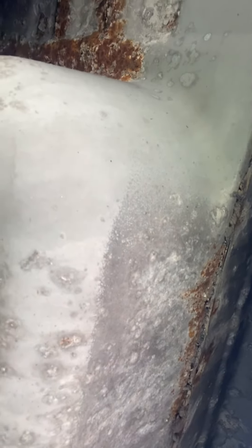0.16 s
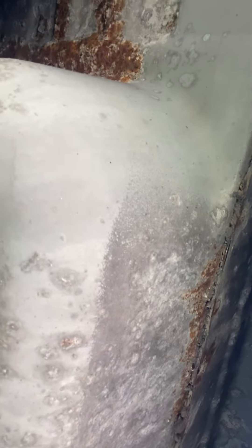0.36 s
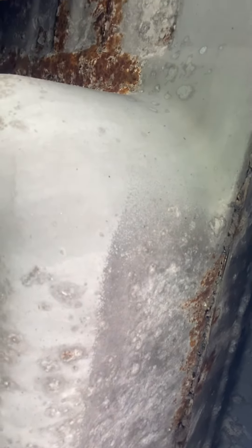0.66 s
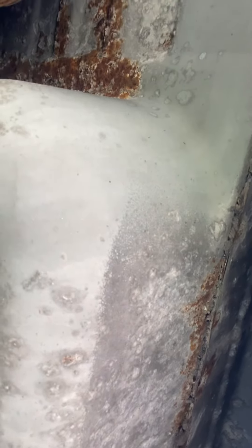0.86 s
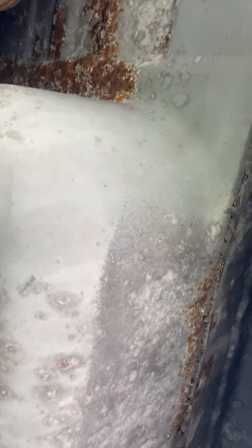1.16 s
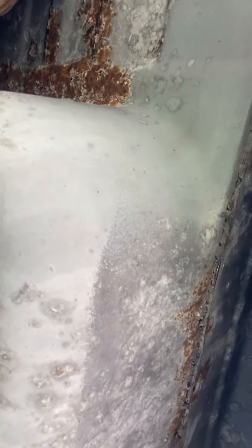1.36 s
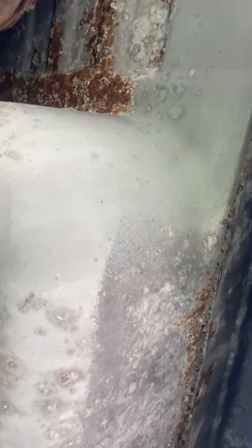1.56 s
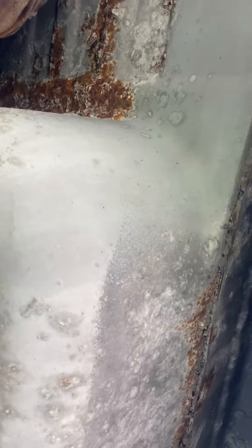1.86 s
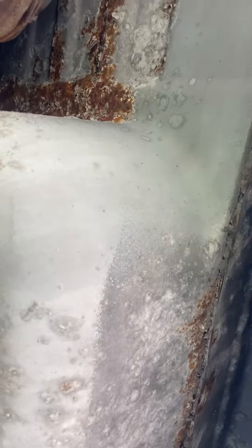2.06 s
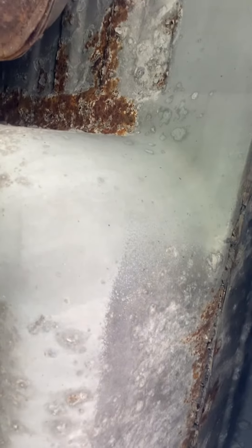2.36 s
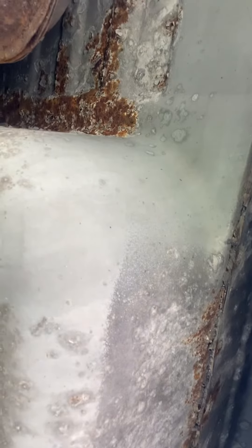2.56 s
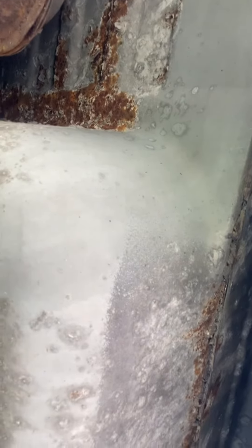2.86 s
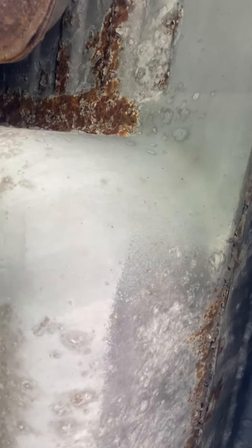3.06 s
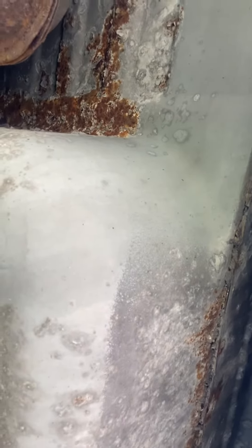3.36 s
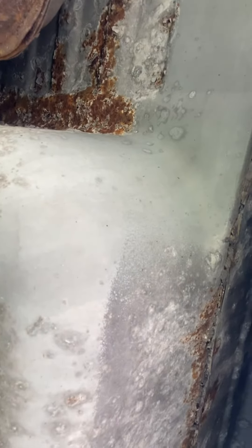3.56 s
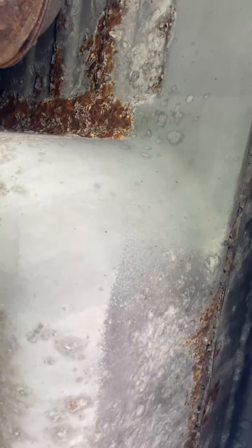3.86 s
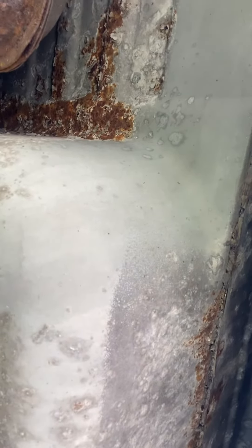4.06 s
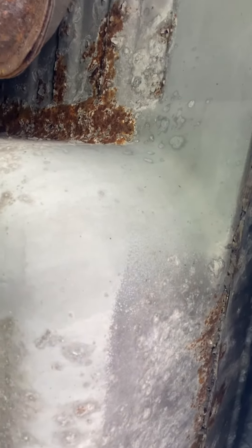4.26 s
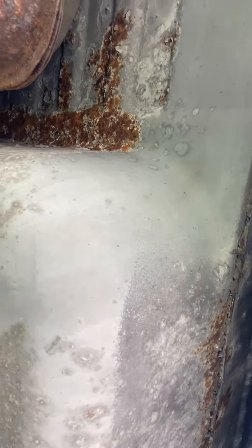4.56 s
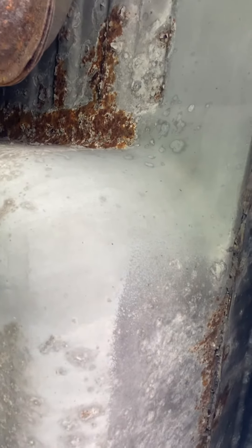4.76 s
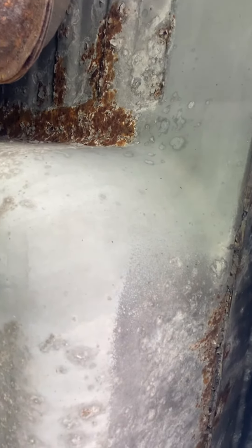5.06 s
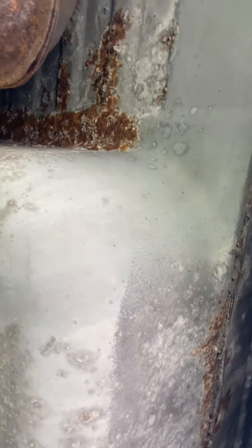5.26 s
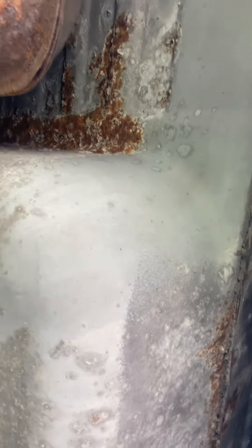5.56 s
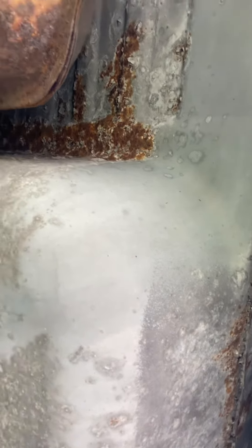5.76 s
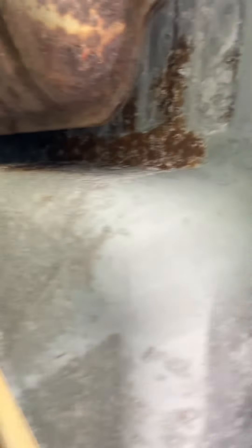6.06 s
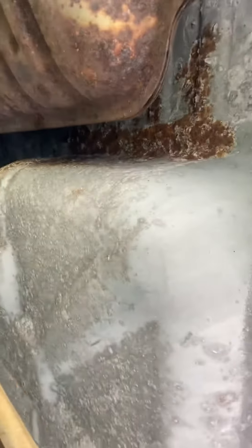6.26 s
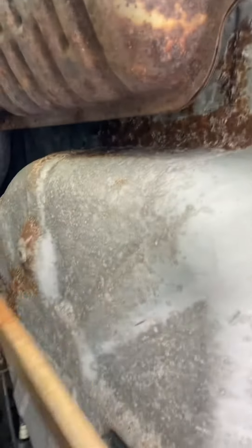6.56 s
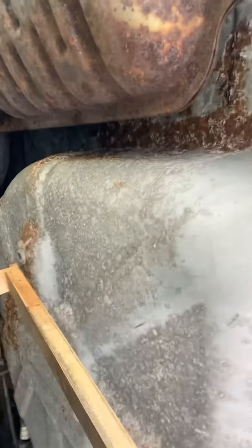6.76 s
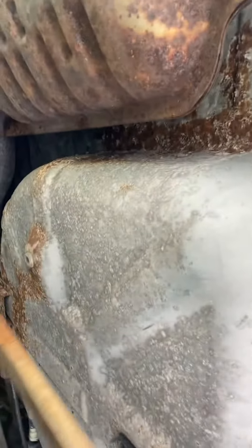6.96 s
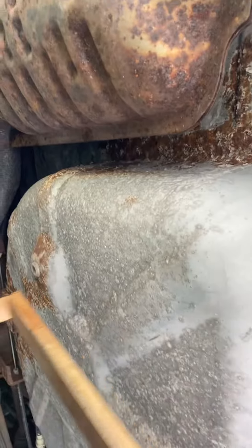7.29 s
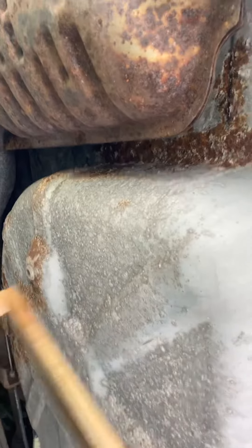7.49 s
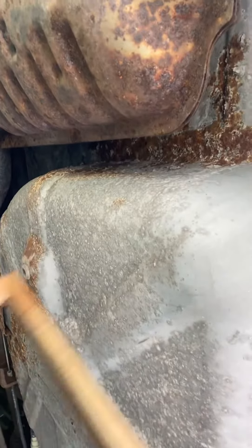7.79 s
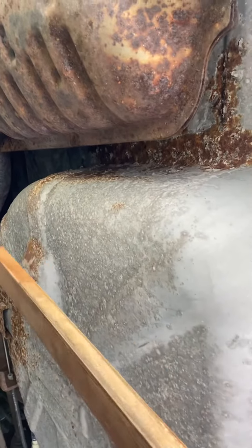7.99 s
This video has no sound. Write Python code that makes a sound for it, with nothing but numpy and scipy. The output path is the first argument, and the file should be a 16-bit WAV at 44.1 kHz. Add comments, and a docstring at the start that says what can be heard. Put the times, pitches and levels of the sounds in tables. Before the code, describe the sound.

A wooden strip raps a hollow steel fuel tank under a car, two to three times a second, very close to the microphone. Each knock has a hard crack, a hollow metallic body and a short low boom. Later blows bounce lightly and change tone as the spot shifts. Behind them lie soft distant traffic rumble and a faint, repeated bird chirp.

```python
"""Wood knocking on a steel fuel tank

A strip of wood strikes the tank under a car two to three times a second, close to a phone with two ports.
Each blow is shaped noise for the crack and clatter plus decaying sines for the boom, coloured by its spot.
The strip at times bounces or scrapes, and a few blows leave a panel singing.
Behind lie a low outdoor rumble of filtered noise and a small bird, a gliding sine that repeats one chirp."""
import sys
import numpy as np
from scipy import signal
from scipy.fft import rfft, irfft, next_fast_len
from scipy.io import wavfile
from scipy.ndimage import uniform_filter1d

SR = 44100
rng = np.random.default_rng(int(sys.argv[2]) if len(sys.argv) > 2 else 0)


def file_out(sig):
    """Save sig as 16-bit WAV at sys.argv[1]."""
    # one column per channel
    cols = np.atleast_2d(sig).T
    # limit, then scale
    lim = np.clip(cols, -1, 1)
    pcm = np.round(lim * 32767).astype(np.int16)
    wavfile.write(sys.argv[1], SR, pcm)


N = 358533

RING = 22050  # samples that one blow or call may last
LEAD = 1024  # samples of soft front edge before a sound
ATTACK_S = 0.0054  # time that the wood takes to press home

# Colour of the crowd of higher modes of wood and sheet steel: frequency_hz, relative level_db per Hz
CLATTER_COLOUR = [(60, -26), (130, 5), (190, -0.5), (240, 2), (430, 4.5), (780, -2), (970, 2.5),
                  (1700, -2.5), (2250, -4.5), (2560, -13.5), (2950, -4.5), (3450, -6), (4200, -13.5),
                  (5000, -32.5), (5700, -20.5), (6700, -15.5), (8000, -28), (10500, -32), (15500, -57)]
# Borders between boom, thud, body, knock, clack, crack, snap and tick: frequency_hz
REGISTER_BORDERS = [175, 370, 750, 1350, 2700, 4200, 6000]


def knock(texture, force_db, hardness_db, crack_db, length, treble_length,
          panel_hz, panel_db, middle_hz, middle_db, upper_hz, upper_db, strip_hz, strip_db,
          spot, modes_db=-12):
    """One blow: the spot colours it, force sets the level, and a harder contact raises the treble most."""
    # Spots on the tank, by name: boom_db, thud_db, body_db, knock_db, clack_db, crack_db, snap_db, tick_db
    spots = {"deep": (-13.5, -15.5, -22, -22, -24.5, -32, -37, -29),
             "full": (-12, -19, -16, -15.5, -19.5, -23, -36.5, -30),
             "round": (-15, -15, -20, -14.5, -18.5, -26.5, -30, -29.5),
             "hollow": (-16.5, -20, -16.5, -18, -19.5, -21.5, -27.5, -25.5),
             "open": (-15.5, -19, -12, -15.5, -15.5, -26.5, -30, -27),
             "dry": (-17.5, -19.5, -25, -20.5, -20, -30.5, -35.5, -34.5),
             "woody": (-19.5, -22, -25, -20, -21.5, -29, -48, -37.5),
             "sharp": (-20, -25.5, -23, -20, -15, -17, -27, -34),
             "stiff": (-17, -19, -27, -38, -24, -28.5, -36, -34.5),
             "edge": (-14.5, -22.5, -27, -33, -17.5, -38, -25, -28.5),
             "hard": (-19, -20.5, -28, -42, -19.5, -27, -26, -26)}
    # Share of the hardness that each register gains, boom to tick: share (no unit)
    hardness_share = (0.083, 0.05, 0.3, 0.56, 0.74, 0.9, 0.8, 0.79)
    levels_db = force_db + np.array(spots[spot]) + hardness_db * np.array(hardness_share)

    x = clatter(texture, max(length, .3), crack_db, treble_length)
    x = bend(x + undb(modes_db) * tank())
    resonances = (panel_hz, panel_db), (middle_hz, middle_db), (upper_hz, upper_db), (strip_hz, strip_db)
    for hz, db in resonances:
        # higher resonances are damped more: a least width plus a share of the centre
        width_hz = 47.5 + 0.025 * hz
        x = resonate(x, hz, width_hz, db)
    return balance(ports(x), REGISTER_BORDERS, levels_db, size=882)


def clatter(texture, length, crack_db, treble_length, crack_tilt_db=-1.2,
            fresh=0.81, apart_db=-5, ragged_db=2.0):
    """Countless overlapping modes, partly alike at every blow: a hard contact, then a short ragged decay."""
    # Decay of the higher modes at relative length 1: frequency_hz, t60_s
    decay_times = [(100, 0.36), (500, 0.35), (1200, 0.22), (2200, 0.24), (3500, 0.17), (10000, 0.13)]
    crack_s = 0.0018  # length of the contact crack at 1 kHz
    crack_halving_octaves = 13.6  # the crack is shorter in the treble: rise in pitch that halves it

    t = np.arange(RING) / SR
    noise = texture + fresh * rng.standard_normal(RING)
    noise = noise + undb(apart_db) * rng.standard_normal((2, RING))  # what differs between the ports
    # the strip chatters on the steel, so the decay comes in uneven spurts
    spurts = np.interp(np.arange(RING), np.arange(0, RING, 100), rng.standard_normal(RING // 100 + 1))
    ragged = noise / rms(noise) * undb(ragged_db * spurts)

    centres = np.geomspace(125, 8000, 7)
    octaves = np.log2(centres / np.median(centres))
    bands = split(ragged, centres[:-1] * np.sqrt(2))
    out = 0
    for band, hz, octave in zip(bands, centres, octaves):
        pace = t / (crack_s * 2 ** (-octave / crack_halving_octaves))
        # the tilt is in dB per octave above 1 kHz
        crack_gain = undb(crack_db + crack_tilt_db * octave)
        crack = crack_gain * 2 * np.sqrt(pace) * np.exp(-pace ** 2)
        # wood that stays on the steel changes how long the treble rings
        treble_share = np.interp(hz, (1000, 6000), (1, max(treble_length, .2)))
        t60 = length * curve(decay_times, hz) * treble_share
        ring = np.minimum(t / ATTACK_S, 1) * decay(t, t60)
        out = out + band * (crack + ring)
    return shape(out, causal(undb(curve(CLATTER_COLOUR, bins(t)))))


def tank(scatter_db=2.5, detune=0.0264, apart_db=2.5):
    """The tank's modes as decaying sines; each blow detunes and weights them anew, the weights per port."""
    # Ringing of the tank before each blow's scatter: frequency_hz, level_db, t60_s
    modes = [(77.6, -0.5, 0.31), (99.6, -4.5, 0.41), (123.4, -2, 0.27), (162.6, -4.5, 0.17),
             (211, 1, 0.073), (240, -3, 0.066), (287.9, -9.5, 0.14), (356.7, -2.5, 0.14), (442.6, -9, 0.16),
             (534, -9.5, 0.11), (558, -4, 0.076), (601.5, -8, 0.1495), (671.3, -12.5, 0.24),
             (874, -17, 0.14), (961, -1.5, 0.071), (1121, 3.5, 0.023), (1434, -5.5, 0.087),
             (1700, -25, 0.11), (1904, -1, 0.017), (2038, -6.5, 0.076), (2306, -13.5, 0.088),
             (3266, -9, 0.025), (3480, -10, 0.052), (3793, -6.5, 0.024), (4170, -27, 0.03),
             (4445, -19.5, 0.022), (6900, -40, 0.021), (10830, -40, 0.019)]
    t = np.arange(RING) / SR
    hz, db, t60 = np.transpose(modes)
    chance = rng.standard_normal((len(hz), 4)).T
    sign = (-1) ** np.arange(len(hz))
    size = undb(db + scatter_db * chance[0] + apart_db * chance[2:]) * sign
    # growth rate of each mode: pitch as the imaginary part, decay as the real part
    pole = 2j * np.pi * hz * (1 + detune * chance[1]) - np.log(1000) / t60
    return size @ np.exp(pole[:, None] * t).imag


def bend(x, lag_s=0.001):
    """Bending waves in sheet steel: the lows travel slowly and arrive late (lag_s at 1 kHz)."""
    return shape(x, np.exp(-4j * np.pi * lag_s * np.sqrt(1000 * bins(x))))


def bounce(texture, thud_db, clack_db, crack_db, tick_db, length,
           modes_db=-11, wood_hz=2100, wood_db=1.0):
    """A glancing touch: clatter and tank modes with one wood resonance, levelled in four registers."""
    # Borders between thud, clack, crack and tick of a rebound: frequency_hz
    borders = [500, 2600, 5200]
    x = clatter(texture, max(length, .3), crack_db=3.0, treble_length=0.49, crack_tilt_db=-1.5)
    x = x + undb(modes_db) * bend(tank())
    x = resonate(x, wood_hz, width_hz=260, db=wood_db)
    return balance(ports(x), borders, (thud_db, clack_db, crack_db, tick_db), size=350)


def panel_ring(hz, db, t60):
    """One lingering tone of the sheet steel: a sine that swells quickly and dies away."""
    t = np.arange(RING) / SR
    fade = np.minimum(t / ATTACK_S, 1) * decay(t, t60)
    return ports(undb(db) * fade * np.sin(2 * np.pi * hz * t))


def scrape(length_s, db, grain_db=4, tilt_db=4):
    """Wood dragged over rusty steel: a brief gritty hiss (tilt_db per octave)."""
    t = np.arange(RING) / SR
    grit = np.interp(np.arange(RING), np.arange(0, RING, 60), rng.standard_normal(RING // 60 + 1))
    hz = bins(t)
    colour_db = curve(CLATTER_COLOUR, hz) + tilt_db * np.log2(hz / 1000)
    gritty = rng.standard_normal(RING) * undb(grain_db * grit)
    x = ports(shape(gritty, undb(colour_db)))
    stroke = np.sqrt(np.abs(np.sin(np.pi * np.minimum(t / length_s, 1))))
    return undb(db) * x / rms(x) * stroke


def bird(buzz_hz=95, buzz_depth=0.026, wander=0.031, clear_at_s=0.1, end_roughness=0.73,
         drop_at_s=0.086, drop_s=0.0167, flutter_db=2.0, echo_db=-5, echo_t60=0.26):
    """A distant bird: a thin buzzy note, then a lower, clearer one that may drop, smeared by walls around."""
    # Calls: start_s, level_db (added to the note's), final drop in pitch_hz
    calls = [(0.245, -59, 453), (1.286, -59, 420), (3.07, -56.5, 506), (3.869, -57, 602), (4.634, -56, 100),
             (5.591, -60.5, 0), (6.425, -52.5, 402), (7.405, -53.5, 3)]
    # The two overlapping notes of a call, before its changes of pace and pitch: time_s, pitch_hz, level_db
    high_note = [(0, 4200, -9), (.012, 4270, 2.5), (.035, 4090, 6), (.055, 3900, 7), (.07, 3900, -28)]
    low_note = [(.025, 3480, -15), (.04, 3370, 12), (.06, 3344, 9), (0.079, 3550, 15.5), (.1, 3520, 11.5),
                (.118, 3470, 2), (.135, 3460, -20)]

    t = np.arange(RING) / SR
    out = np.zeros((1, N))
    for start, call_db, drop_hz in calls:
        pace = t * np.exp(0.061 * rng.standard_normal())  # each call runs a little faster or slower
        for note in high_note, low_note:
            s, hz, db = np.transpose(note)
            drop = drop_hz * np.clip((pace - drop_at_s) / drop_s, 0, 1)
            pitch = np.interp(pace, s, hz) - drop
            buzz = buzz_depth * np.sin(2 * np.pi * buzz_hz * t)
            waver = uniform_filter1d(rng.standard_normal(RING), size=100)
            rough = np.interp(pace, (0, clear_at_s), (1, end_roughness))
            pitch = pitch * (1 + rough * (buzz + wander * waver / rms(waver)))

            flutter = uniform_filter1d(rng.standard_normal(RING), size=300)
            level_db = call_db + np.interp(pace, s, db) + flutter_db * flutter / rms(flutter)
            gain = undb(level_db) * (pace > s[0]) * (pace < s[-1])
            add(out, start, gain * np.sin(2 * np.pi * np.cumsum(pitch) / SR)[None])
    walls = rng.standard_normal((2, RING)) * decay(t, echo_t60)
    echo = signal.fftconvolve(out, walls / np.linalg.norm(walls[0]))[:, :N]
    return ports(out + undb(echo_db) * echo, near=0.)


def outdoors(db=-35, apart_db=-12, flutter_db=(2.2, 1.5, 0.5), near=0.62):
    """Far traffic: a deep, wavering rumble under a soft, nearly steady hiss, all of filtered noise."""
    # Colour of the outdoor background: frequency_hz, relative level_db per Hz
    colour = [(20, -60), (29, -16), (35, 0), (60, -0.5), (125, -1.5), (200, -14), (400, -16.5), (850, -23),
              (1000, -21), (2150, -26.5), (2480, -33.5), (3200, -32.5), (4000, -38.5), (5000, -54),
              (6600, -40), (10000, -52.5), (11800, -58.5), (13000, -64), (15000, -80)]
    size = next_fast_len(N)
    air = rng.standard_normal(size) + undb(apart_db) * rng.standard_normal((2, size))
    air = ports(shape(air, undb(curve(colour, bins(air)))), near)
    knots = np.linspace(0, size, 60)
    wavering = 0
    for band, depth_db in zip(split(air, REGISTER_BORDERS[1:3]), flutter_db):
        swell = np.interp(np.arange(size), knots, rng.standard_normal(len(knots)))
        wavering = wavering + band * undb(depth_db * swell)
    return undb(db) * wavering[:, :N] / rms(wavering)


def ports(x, near=0.64):
    """The two microphone ports differ in phase, and in level by the share `near` of their balance."""
    # Phase between the ports: frequency_hz, radians by which left leads
    port_phase = [(0, 0), (100, .1), (200, .6), (270, 1.1), (450, 1.6), (700, 2), (1000, 1.1), (1460, -.1),
                  (2150, -1.2), (2550, -1.9), (2900, -3.3), (3500, -4), (4200, -5.2), (4800, -8.7),
                  (6500, -9.9), (9000, -11.6), (12000, -12.9), (16000, -15)]
    # Level between the ports at near = 1: frequency_hz, left minus right level_db
    port_balance = [(30, 14), (65, -12), (105, -2.5), (190, -24), (370, -4), (700, -6), (980, 5.5),
                    (1350, 3.5), (1900, 5), (3500, 3), (5000, 1.5), (15000, -1.5)]
    hz = bins(x)
    lead = np.interp(hz, *np.transpose(port_phase))
    lean = undb(near * curve(port_balance, hz) / 2)
    return shape(x, np.array([lean * np.exp(1j * lead), 1 / lean]))


def resonate(x, hz, width_hz, db):
    """Add one resonance of the given width to x."""
    f = bins(x)
    return shape(x, 1 + undb(db) / (1 + 1j * (f ** 2 - hz ** 2) / (f * width_hz)))


def balance(x, edges, levels_db, size):
    """Bring each register of x to its level, taken over its loudest stretch of size samples."""
    out = 0
    for band, db in zip(split(x, edges, order=12), levels_db):
        power = uniform_filter1d((band ** 2).mean(0), size=size)
        loudest = np.sqrt(power.max())
        out = out + band * undb(db) / loudest
    return out


def split(x, edges, order=8):
    """Cut x into adjoining bands that add up to x."""
    hz = bins(x)
    below = [1 / (1 + (hz / edge) ** order) for edge in edges]
    gains = np.diff([0 * hz, *below, 1 + 0 * hz], axis=0)
    return [shape(x, gain) for gain in gains]


def causal(gain):
    """Give a gain curve the phase of a real resonator, so that its response does not precede the blow."""
    cepstrum = irfft(np.log(np.maximum(gain, 1e-5)))
    half = len(cepstrum) // 2
    # fold the backward half of the cepstrum onto the forward half
    cepstrum[1:half] *= 2
    cepstrum[half + 1:] = 0
    return np.exp(rfft(cepstrum))


def shape(x, gain):
    """Filter x with one gain per frequency."""
    return irfft(rfft(x) * gain, x.shape[-1])


def curve(points, hz):
    """Read (Hz, value) points on a log-frequency axis."""
    f, value = np.transpose(points)
    return np.interp(np.log(hz), np.log(np.maximum(f, 1)), value)


def bins(x):
    """Frequencies of the spectrum of x in Hz, at least 1."""
    return np.maximum(np.fft.rfftfreq(x.shape[-1], 1 / SR), 1)


def decay(t, t60):
    """Exponential decay that falls by 60 dB in t60 seconds."""
    return np.exp(-np.log(1000) * t / t60)


def undb(db):
    """Decibels to gain."""
    return 10 ** (np.asarray(db) / 20)


def rms(x):
    """Root mean square."""
    return np.sqrt(np.mean(x ** 2))


def add(out, s, sound):
    """Mix a sound in at time s; the end of its buffer, where filters wrap round, is its soft front edge."""
    start = max(int(s * SR) - LEAD, 0)
    out[:, start:start + sound.shape[-1]] += np.roll(sound, LEAD, axis=-1)[:, :N - start]


def scene():
    """Blows, rebounds, singing panels and scrapes over the background."""
    # Blows: start_s, force_db, hardness_db of the contact, crack_db over the ring at 1 kHz,
    # relative ring length, relative length of the treble ring, panel_hz, panel_db, middle_hz, middle_db,
    # upper_hz, upper_db, strip_hz, strip_db (four resonances), name of the spot that is struck
    blows = [(0.029, 0.5, 2, 7.5, 0.53, 0.88, 483, -5, 980, 2, 1515, 10, 4500, 0, "full"),
             (0.386, -0.5, -1, 2.5, 0.47, 0.78, 257, 18, 1360, -15, 1900, 0, 3200, -10, "dry"),
             (0.701, -0.5, 1.5, -2, 0.51, 0.95, 280, 1, 1090, -20, 2050, 0, 3950, -11, "dry"),
             (1.078, -0.5, 0, 7, 0.41, 0.72, 446, -25, 1684, 6, 2290, 8, 3410, 0, "sharp"),
             (1.502, 1, -3.5, -0.5, 0.38, 1.1, 267, 9, 1640, 4, 2400, 12, 3420, 5, "sharp"),
             (1.881, 0, -5.5, -1, 0.53, 0.92, 580, -9, 990, -3, 1550, -9, 3900, -5, "full"),
             (2.262, -1.5, 3.5, 3, 0.48, 1.05, 222, 24.5, 986, 7, 2350, 4, 4120, -22, "round"),
             (2.62, 1, 3, 7, 0.49, 1.24, 238, 4, 974, 15, 1930, -12, 10380, 12.5, "deep"),
             (2.98, 1, -5, 7.5, 0.62, 0.96, 255, -21, 996, 9, 1400, 3, 3480, -21, "round"),
             (3.325, -2, -4.5, -1, 0.48, 1.1, 230, -1, 1000, -11, 1870, 6, 3470, -2, "deep"),
             (3.713, 3.5, 0, 6.5, 0.34, 1.9, 221, 9, 993, -2, 1970, 2, 2680, -5, "woody"),
             (4.3, 3, -4.5, 5.5, 0.55, 0.95, 231, 2, 1050, -21, 2120, 14, 3970, 7, "round"),
             (4.807, -1.5, -2, -10, 0.46, 0.62, 253, -9, 1020, -1, 1980, 5, 3250, -9, "woody"),
             (5.2, 0, -0.5, 6, 0.47, 0.73, 478, 3.5, 1020, -7, 2124, 6, 4080, -12, "hollow"),
             (5.562, -1.5, 1, -1, 0.47, 0.81, 360, -14, 1060, -5, 1970, -6, 3370, -4, "hollow"),
             (5.989, 0, 1.5, 5, .45, 0.7, 394, -4, 980, 2, 2320, -6, 3500, -13, "hollow"),
             (6.419, -8, -10, 6.5, 0.56, 1.2, 277, -13, 1420, -3, 2220, 1, 3880, 14, "stiff"),
             (6.708, -1.5, 0, 5.5, 0.47, 1, 430, 0, 1690, -2, 2130, -6, 3700, -14, "open"),
             (7.094, 0, -1, 8.5, .56, 0.53, 275, 9, 1343, 5, 2400, 1, 5060, 6, "edge"),
             (7.488, -2, -1.5, 1, 0.41, 0.47, 300, 21, 1330, 4, 2200, 5, 3200, -5, "stiff"),
             (7.784, 2, 1.5, 11.5, 0.45, 0.56, 286, 24, 2190, 5, 2520, 13, 3610, 11, "hard")]
    # Light touches and rebounds of the strip: start_s, thud_db, clack_db, crack_db, tick_db,
    # relative ring length
    touches = [(1.942, -15.5, -23.5, -51, -41.5, 0.49), (2.641, -18, -27.5, -31, -29, 0.52),
               (2.709, -42, -37.5, -44, -36.5, 0.71), (3.014, -24, -20, -54, -39, 0.42),
               (3.341, -23, -26, -33, -43, 0.38), (3.375, -30, -39, -47, -44, 0.85),
               (3.791, -38, -61, -61, -56, .5), (4.345, -31, -52, -53, -45, 0.36),
               (4.393, -38, -36, -40, -38.5, 0.43), (5.258, -24.5, -18, -30.5, -45, 0.49),
               (5.283, -52, -29.5, -52, -65, 0.48), (5.624, -47, -25.5, -55, -64, 0.55),
               (5.638, -33, -22, -35, -46, 0.51), (5.667, -43, -32, -56, -71, 0.37),
               (6.03, -19.5, -21.5, -37.5, -47, 0.59), (6.043, -27, -33, -46, -43, 0.42),
               (6.768, -25.5, -22.5, -35, -46, .75)]
    # A few blows leave one panel singing: start_s, pitch_hz, level_db ahead of the ports, t60_s
    singing_panels = [(0.035, 390, -19, 0.19), (1.888, 590, -11.5, 0.082), (4.305, 583, -17.5, 0.14),
                      (4.31, 718, -14.5, 0.13)]
    # The strip slides a little on the steel after a blow: start_s, length_s, level_db before its fade
    slides = [(3.011, 0.068, -41.5), (3.348, 0.08, -46.5), (3.739, 0.053, -50)]

    out = outdoors() + bird()
    texture = rng.standard_normal(RING)  # the fine pattern of modes that belongs to this tank
    for s, *blow in blows:
        add(out, s, knock(texture, *blow))
    for s, *touch in touches:
        add(out, s, bounce(texture, *touch))
    for s, *ring in singing_panels:
        add(out, s, panel_ring(*ring))
    for s, length_s, db in slides:
        add(out, s, scrape(length_s, db))
    return out


def record(dry, low_cut_hz=27, top_hz=15800):
    """The phone drops the deepest bass, rounds the loudest peaks and cuts the top."""
    x = signal.sosfilt(signal.butter(4, low_cut_hz, "high", fs=SR, output="sos"), dry)
    x = x / (1 + (x / .95) ** 4) ** .25
    return signal.sosfilt(signal.ellip(8, .2, 70, top_hz, fs=SR, output="sos"), x)


dry = scene()
out = record(dry)
file_out(out)
```